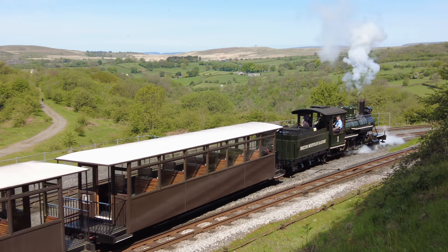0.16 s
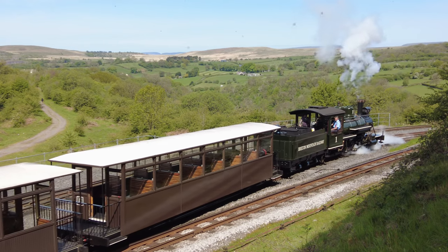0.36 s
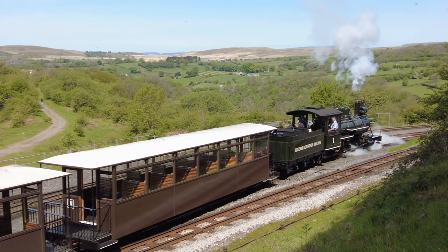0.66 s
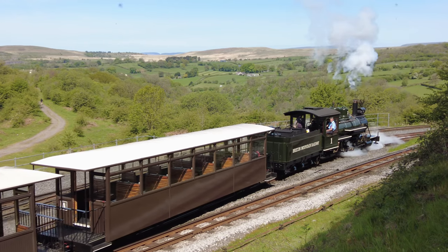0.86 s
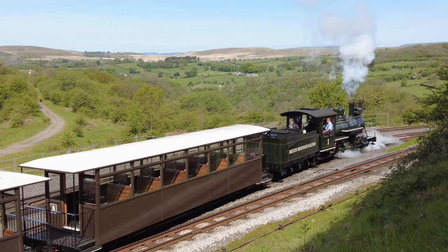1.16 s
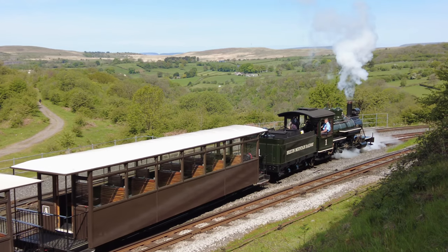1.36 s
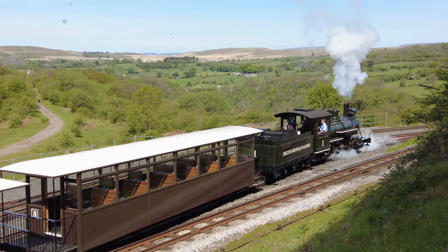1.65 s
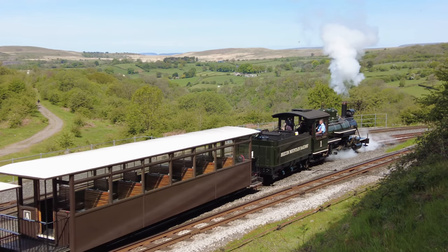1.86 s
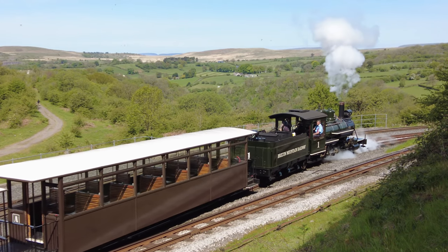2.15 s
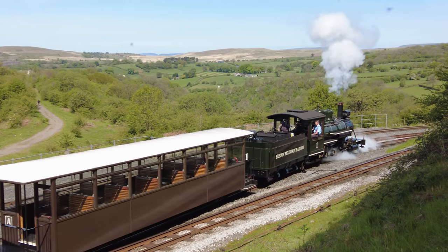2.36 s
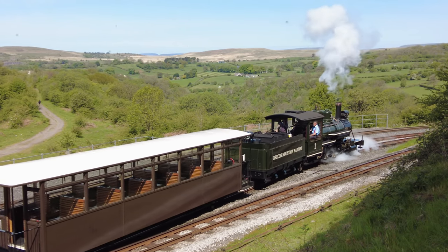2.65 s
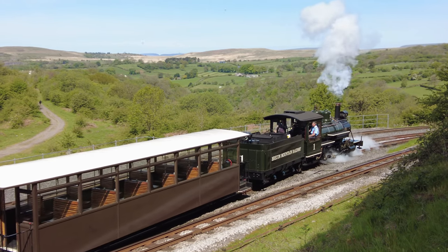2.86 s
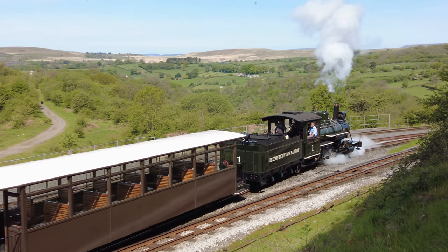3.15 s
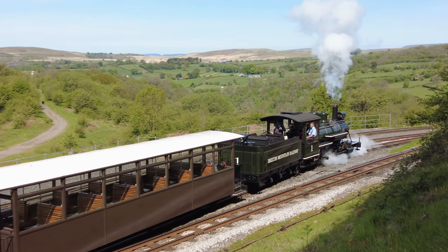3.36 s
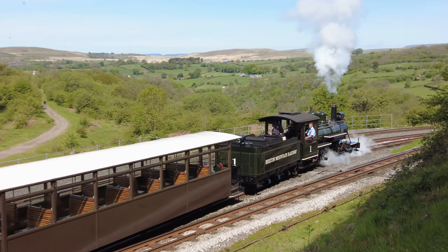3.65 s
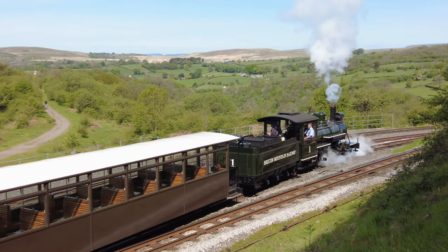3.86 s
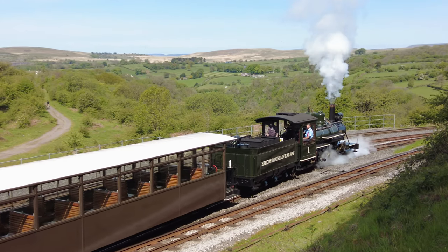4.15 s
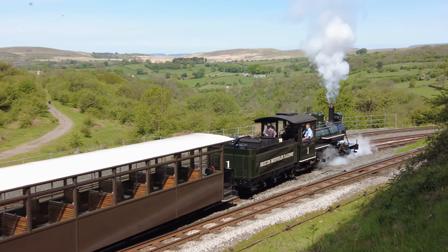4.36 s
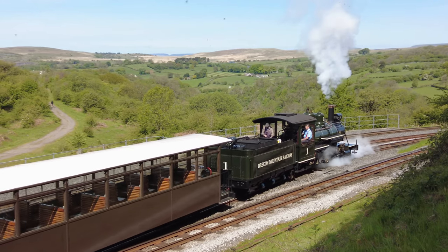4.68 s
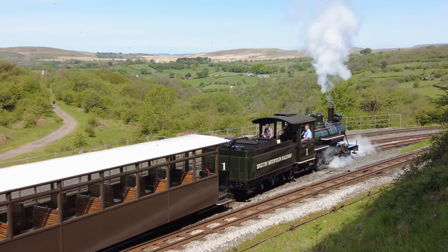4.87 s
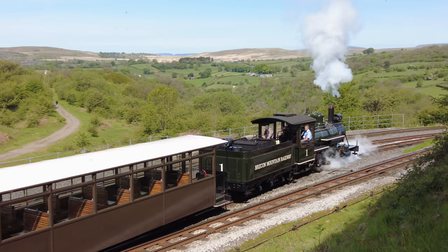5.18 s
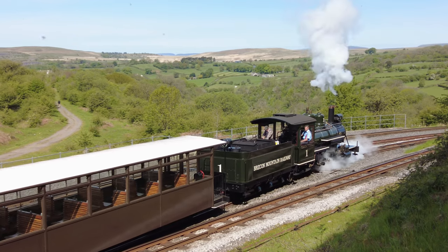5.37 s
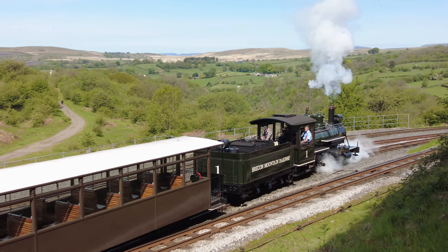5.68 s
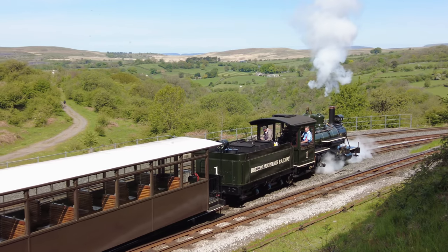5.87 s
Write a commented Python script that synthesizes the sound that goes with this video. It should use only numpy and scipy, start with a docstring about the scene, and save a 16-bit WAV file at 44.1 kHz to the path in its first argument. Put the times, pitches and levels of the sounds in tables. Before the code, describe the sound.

Soft, hollow steam-engine puffs beat evenly through loud breathy cylinder hiss, with low carriage rumble, dull rail knocks and one tiny steel squeak.

```python
"""Exhaust beats of a small steam locomotive ring in its chimney on an open hillside.
Open cylinder cocks hiss with each piston stroke and fall away at its end: noise through drain-pipe resonances.
Behind them the carriages rumble, lurch and knock: low noise on level curves, and struck resonators.
A piece of steel squeaks once, as decaying sine partials; a faint noise tail answers the beats."""
import sys
import numpy as np
from scipy import signal
from scipy.fft import rfft, irfft, next_fast_len
from scipy.io import wavfile
from scipy.ndimage import uniform_filter1d, map_coordinates

SR = 44100
rng = np.random.default_rng(int(sys.argv[2]) if len(sys.argv) > 2 else 0)


def to_wav(sig):
    """Store sig (one row per channel, or 1-D mono) as 16-bit WAV at the path in sys.argv[1].

    Samples outside -1..1 are clipped; the rate is SR.
    """
    pcm = np.clip(np.atleast_2d(sig), -1, 1) * 32767
    pcm = np.round(pcm).astype(np.int16)
    wavfile.write(sys.argv[1], SR, pcm.T)  # frames by channels


N = 265482

# exhaust beats, before layer offsets: [t/s, level/dB, width/s, chimney boom level/dB, jet bark level/dB]
CHUFFS = [(0.081, -23.5, 0.024, -3, -6), (0.646, -23.5, 0.022, -4.5, -5.5), (1.201, -23, 0.019, -3.5, -7),
          (1.79, -21, 0.023, -5.5, -10), (2.395, -21, .022, -3, -7), (2.946, -20, 0.021, -4.5, -13),
          (3.489, -22.5, 0.018, -1, -9), (4.063, -22.5, 0.024, -2.5, -10), (4.649, -20.5, 0.023, -2, -10),
          (5.194, -22, 0.023, -3.5, -6), (5.724, -23.5, 0.024, -1.5, -8.5)]
# colour of the chimney body: [f/Hz, level/dB per Hz]
CHIMNEY = [(60, -30), (150, -13), (240, -11.5), (350, -9), (430, -3.5), (620, -1), (820, -2.5),
           (1000, -9.5), (1350, -14), (1800, -19.5), (4000, -52)]
# colour of the sharp blast-pipe jet: [f/Hz, level/dB per Hz]
BLAST = [(400, -22), (900, 7), (1600, 2.5), (2400, 5), (3200, -1.5), (5000, -7), (10000, -34)]
# air modes of the chimney: [f/Hz, width/Hz, lift/dB]
CHIMNEY_MODES = [(324, 35, 5.5), (467.6, 50, 8), (581, 26, 6), (630, 47, 5), (810, 100, 2), (1127, 50, 5.5),
                 (1270, 83, 7), (1800, 50, 5)]


def exhaust(jet_lead_s=0.0064, boom_lag_s=0.002, sag_lag_s=0.0072, sag_db=-7, rough_db=0.73, split_hz=530):
    """Each beat starts with a sharp jet, fills the chimney, and darkens as the pressure drops."""
    jet, body, boom, sag = np.zeros((4, N))
    for s, db, width, boom_db, bark_db in CHUFFS:
        jet += amp(db + bark_db) * swell(s - jet_lead_s, width)
        body += amp(db) * swell(s - .002, 0.66 * width)
        boom += amp(db + boom_db - 3.0) * swell(s + boom_lag_s, 0.93 * width)
        sag += amp(db + boom_db + sag_db) * swell(s + sag_lag_s, width)
    chimney = rush(CHIMNEY, CHIMNEY_MODES)
    low = below(chimney, split_hz)
    puff = body * even(chimney - low, span=0.035)
    puff += boom * even(low, span=0.034)
    dark = rush([(80, -13), (250, -5.5), (480, -0.5), (700, -9), (1500, -33)], CHIMNEY_MODES)
    puff += sag * dark
    puff += jet * rush(BLAST) * amp(1.5 * wobble(540))
    return puff * amp(rough_db * wobble(170))  # eddies tear at the blast


# colour of the steam jet, before its bands are levelled: [f/Hz, level/dB per Hz]
JET = [(300, -24), (1050, -18.5), (1400, -11.5), (2150, -6.5), (2500, -4), (3400, -1), (5000, -1.5),
       (6300, -1), (8500, -0.5), (10500, -2), (12000, -7.5), (14500, -9)]
# resonances of the drain pipes: [f/Hz, width/Hz, lift/dB]
COCK_MODES = [(1269, 39, 9), (1930, 63, 6), (2724, 100, 4.5), (3030, 82, 4.5), (3970, 71, 2),
              (4220, 105, 5.5), (4500, 700, 4), (5070, 69, -1), (6070, 230, 2), (7720, 450, 5.5),
              (9100, 200, 1)]
SHUT_DB, SHUT_S = 8, 0.016  # dip of the hiss at dead centre: depth, width
SPURT_DB, SPURT_LAG_S, SPURT_S = 1.6, .055, .022  # spurt as the valve reopens: lift, delay, width
HOLLOW_FOLLOWS, SIZZLE_SWELL_DB = .5, 2.5  # share of the swell in the hollow rush; extra swell of the sizzle


def cocks(flutter_db=.5, band_flutter_db=0.64, wander_db=.4, rush_db=-5.5, hiss_db=-3, sizzle_db=-3,
          drone_db=-44, drone_share=0.3):
    """Steam whistles faintly in the drain pipes and breaks into a hiss that swells and shuts with each stroke."""
    level_db, swell_db, hollow_db, bright_db, slack = piston()
    open_db = level_db
    for s, *_ in STROKES:
        open_db = open_db + SPURT_DB * swell(s + SPURT_LAG_S, SPURT_S) - SHUT_DB * swell(s, SHUT_S)
    sag_db = swell_db * slack
    hollow_flow_db = hollow_db - HOLLOW_FOLLOWS * sag_db
    jet = patchy(rush(JET, COCK_MODES), depth_db=1.4)
    lowest, low, middle = below(jet, 1830), below(jet, 3620), below(jet, 6930)
    parts = [(low - lowest, rush_db + hollow_flow_db),
             (middle - low, hiss_db - sag_db),
             (jet - middle, sizzle_db + bright_db - sag_db - SIZZLE_SWELL_DB * slack)]
    steam = sum(unit(part) * amp(db + band_flutter_db * wobble(35)) for part, db in parts)
    # the lowest pipe tone grows only slowly with the flow
    flow_db = open_db + hollow_flow_db
    drone = unit(lowest) * amp(drone_db + drone_share * (flow_db - flow_db.mean()) + wobble(20))
    unsteady_db = wander_db * wobble(8) + flutter_db * wobble(45) + 0.21 * wobble(200)
    return drone + steam * amp(open_db + unsteady_db)


# strokes of the near cylinder, alternately strong and weak, before layer offsets:
# [dead centre t/s, crest level/dB, swell level/dB, crest as share of stroke, hollow level/dB, sizzle level/dB]
STROKES = [(-0.98, -33, 0, .5, 0, -2), (0.128, -24.2, 9.5, .55, -4.8, -2.2),
           (1.243, -30.4, .7, .35, -3, -3.2), (2.447, -23.9, 11, .67, -4.8, -1.3),
           (3.526, -30.8, 1.8, .55, -1.6, .9), (4.697, -24, 7.8, .88, -.7, -.7),
           (5.765, -30, 0, .4, .3, -1)]
LAST_STROKE_S, END_SLACK = 1.13, .6  # length of the last stroke; share of the swell lost again by a stroke's end


def piston():
    """Piston travel drives the steam: level, swell, hollow rush, sizzle (dB) and slack (1 at start, 0 at crest)."""
    t = np.arange(N) / SR
    starts, *columns = np.transpose(STROKES)
    lengths = np.append(np.diff(starts), LAST_STROKE_S)
    stroke = np.searchsorted(starts, t) - 1
    level_db, swell_db, crest, hollow_db, sizzle_db = np.array(columns)[:, stroke]
    past = (t - starts[stroke]) / lengths[stroke] - crest
    rising = (past / crest) ** 2
    falling = END_SLACK * (past / np.maximum(1 - crest, 1e-3)) ** 2
    slack = np.where(past < 0, rising, falling)
    return uniform_filter1d(np.array([level_db, swell_db, hollow_db, sizzle_db, slack]), size=1024, axis=1)


def patchy(x, depth_db):
    """Turbulence lifts and drops patches a few hundred hertz wide and a tenth of a second long."""
    z = signal.stft(x, nperseg=512)[2]
    field = rng.standard_normal(z.shape[1:])
    field = uniform_filter1d(field, size=4, axis=0)
    field = uniform_filter1d(field, size=20, axis=1)
    return signal.istft(z * amp(depth_db * unit(field)), nperseg=512)[1][:, :N]


# copies of the hiss off ballast and frames: [delay t/s at mid-scene, gain]
GROUND = [(.0016, 0.1), (.00247, -.09), (.0051, .05), (.0083, 0.028)]


def grounded(x, drift=0.0046):
    """Short reflections comb the hiss; their paths change by a share drift each second as the engine moves."""
    n = np.arange(N)
    stretch = 1 + drift * (n - N / 2) / SR
    out = x.copy()
    for delay, gain in GROUND:
        out += gain * np.array([np.interp(n - delay * SR * stretch, n, c) for c in x])
    return out


# rolling carriages, before layer offsets: [t/s, deep rumble level/dB, wheel roll level/dB]
RUMBLE = [(0.0, -37, -46), (0.3, -36, -41), (0.9, -44, -48), (1.35, -36, -42), (1.62, -39, -44),
          (2.2, -36, -44), (2.7, -41, -43), (3.4, -39, -40), (4.4, -38, -42), (4.95, -41, -45),
          (5.3, -37, -42), (6.02, -41, -45)]
# colour of the deep rumble: [f/Hz, level/dB per Hz]
DEEP = [(10, -12), (22, 0), (42, 0), (60, -2), (90, -10), (160, -48), (400, -74)]
# colour of the wheel roll: [f/Hz, level/dB per Hz]
ROLL = [(50, -10.5), (100, 1), (125, -1.5), (160, -1), (230, -9.5), (380, -16), (480, -15.5), (700, -33),
        (1100, -41), (3000, -45)]
# heavy lurches of the carriages: [t/s, deep level/dB, width/s]
LURCHES = [(.24, -36, .018), (.4, -32, .016), (1.4, -38, .03), (2.25, -29.5, .02), (2.34, -29, .026)]
DEEP_DB, ROLL_DB = -0.8, -1.2  # each layer over its level curve
PUSH_DB, THUMP_DB, PUSH_S = -38, -38, .032  # low puff of air at a beat: deep part, thump, width
LURCH_ROLL_DB = -13  # wheel roll in a lurch, relative to its deep part


def rumble(deep_uneven_db=2.6, roll_uneven_db=1.8):
    """Heavy carriages roll unevenly on the rails and lurch; each exhaust beat adds a low push of air."""
    deep_db, roll_db = curves(RUMBLE)
    beats = sum(swell(s, PUSH_S) for s, *_ in CHUFFS)
    lurches = sum(amp(db) * swell(s, width) for s, db, width in LURCHES)
    deep_roll = amp(deep_db + DEEP_DB + deep_uneven_db * wobble(14))
    wheel_roll = amp(roll_db + ROLL_DB + roll_uneven_db * wobble(25))
    # unrelated causes add in power
    deep = np.hypot(deep_roll, amp(PUSH_DB) * beats + lurches)
    roll = np.hypot(wheel_roll, amp(THUMP_DB) * beats + amp(LURCH_ROLL_DB) * lurches)
    return even(rush(DEEP), span=0.115) * deep + rush(ROLL) * roll


# wheels over rail joints and slack couplings: [t/s, nominal level/dB, dull thud relative level/dB]
KNOCKS = [(.205, -31, -7), (.295, -31.5, -3), (0.344, -39, 6), (.97, -45, -6), (1.315, -29.5, -11),
          (1.388, -41, 8.5), (3.355, -34, -18), (4.232, -33.5, -3), (5.24, -28, -7), (5.595, -28, -11)]
# ring of a bogie: [f/Hz, width/Hz, level/dB]
BOGIE = [(330, 140, -7), (520, 170, 6), (780, 240, -1), (1100, 140, -10)]
# ring of the carriage floor: [f/Hz, width/Hz, level/dB]
THUD = [(150, 93, -4), (240, 120, -1)]
# colour of steel rolling on steel: [f/Hz, level/dB per Hz]
TREAD = [(100, -20), (220, -3.5), (400, -2), (560, -1), (850, -1), (1150, -3.5), (1350, -17), (3000, -35)]
# loudness of the treads, before their unevenness: [t/s, level/dB]
TREAD_LEVEL = [(0, -51), (2, -47.3), (6, -47.2)]
# the carriages, off to the left: [f/Hz, left lead/rad]
ASIDE = [(100, .3), (300, 1.2), (550, 1.75), (850, 2.1), (1300, 1.6)]


def bogies(t60=.13, attack_s=0.0044, spread=0.29):
    """Wheel treads roar softly and knock over the joints, away to the left and partly diffuse."""
    t = np.arange(N) / SR
    knock, thud = np.zeros((2, N))
    for s, db, thud_db in KNOCKS:
        age = np.maximum(t - s, 0)
        blow = amp(db - 60 * age / t60) * (1 - np.exp(-age / attack_s))
        knock += blow
        thud += blow * amp(thud_db)
    tread_db, = curves(TREAD_LEVEL)
    pair = rush(TREAD) * amp(tread_db + 1.6 * wobble(7.8))
    for blows, modes in (knock, BOGIE), (thud, THUD):
        grit = rng.standard_normal((2, N))
        pair += ring(grit * blows, modes) / np.std(ring(grit, modes))
    sign = np.array([[1], [-1]])
    both = (pair[0] + spread * sign * pair[1]) / np.hypot(1, spread)
    return filtered(both, lambda hz: np.exp(.5j * sign * along(ASIDE, hz)))


# rubs of steel on steel: [t/s, nominal level/dB, rub length t/s]
SQUEAKS = [(2.211, -27.5, 0.011)]
# partials of the ringing steel: [f/Hz, relative level/dB, t60/s]
STEEL = [(740, -11, .05), (1272, 1.5, 0.083), (1326, -9, .06), (1717, -5, .066), (1870, -12, .1)]


def squeak(attack_s=0.0053, waver_rad=.5, lead_rad=0.98):
    """Steel rubs on steel under a carriage and rings with a short whistling note; the left side leads."""
    t, out = np.arange(N) / SR, np.zeros((2, N))
    lead = np.array([[lead_rad], [0]])
    for s, db, length in SQUEAKS:
        rise = 1 - np.exp(-np.maximum(t - s, 0) / attack_s)
        free = np.maximum(t - s - length, 0)  # time since the rub let go
        for hz, mode_db, t60 in STEEL:
            level = rise * amp(db + mode_db - 60 * free / t60)
            out += level * np.sin(2 * np.pi * hz * t + lead + waver_rad * wobble(250))
    return out


# decay of the hillside tail: [f/Hz, t60/s]
HILL = [(200, .6), (1000, 0.52), (6000, 0.14)]


def hillside(x):
    """Slope and trees scatter back a thin tail whose treble dies first."""
    hz, t, z = signal.stft(rng.standard_normal((2, SR)), SR, nperseg=256)
    decay = amp(-60 * t / along(HILL, hz)[:, None])
    tail = signal.istft(z * decay, SR, nperseg=256)[1]
    return signal.fftconvolve(x, tail / np.linalg.norm(tail[0]), axes=1)[:, :N]


# likeness of left and right: [f/Hz, likeness 0-1]
ALIKE = [(60, 0.99), (700, 0.94), (1900, 0.89), (2700, 0.91), (3450, 0.43), (4300, 0.66), (5250, 0.18),
         (6200, 0.53), (7000, .3), (7800, 0.41), (8600, 0.24), (11000, 0.69), (14000, 0.25)]
# balance of the sides: [f/Hz, left minus right level/dB]
PAN = [(30, -3), (100, 0), (3200, 0), (4300, -2.5), (6000, 0.7), (7300, -2.5), (8800, -0.5), (10000, -1),
       (14000, -3)]
# phase between the sides: [f/Hz, left lead/rad]
LEAD = [(100, 0), (280, -.13), (480, -.55), (750, -.68), (1000, -.4), (1500, -.08), (1750, -.3),
        (2000, -.1), (2200, -.45), (3000, -.5), (3700, -1.05), (5100, -.5), (6700, -2.3), (7900, -.9),
        (9400, -2.3), (10500, -2.1), (13000, -3)]


def ports(pair):
    """The first signal reaches both sides alike, the second opposed; the left mostly hears a little later."""
    turn = lambda hz: np.arccos(np.clip(along(ALIKE, hz), 0, 1)) / 2
    mid, side = filtered(pair, lambda hz: np.array([np.cos(turn(hz)), np.sin(turn(hz))]))
    sign = np.array([[1], [-1]]) / 2
    offset = lambda hz: amp(sign * along(PAN, hz)) * np.exp(1j * sign * along(LEAD, hz))
    return filtered(np.array([mid + side, mid - side]), offset)


def rush(spectrum, modes=()):
    """Two unrelated noises of joint rms 1, coloured by a spectrum and lifted at its resonances."""
    lift = lambda hz: sum(db / (1 + (2 * (hz - centre) / width) ** 2) for centre, width, db in modes)
    return unit(filtered(rng.standard_normal((2, N)), lambda hz: amp(along(spectrum, hz) + lift(hz))))


def ring(x, modes):
    """x through damped (f/Hz, width/Hz, level/dB) resonators."""
    return filtered(x, lambda f: sum(amp(db) * 1j * f * w / (c * c - f * f + 1j * f * w) for c, w, db in modes))


def even(x, span):
    """Noise whose power is held steady over span seconds."""
    power = uniform_filter1d(x ** 2, max(int(span * SR), 1), axis=-1)
    return x / np.sqrt(np.abs(power) + 1e-9)


def below(x, edge_hz):
    """The part of x under a steep edge."""
    return filtered(x, lambda hz: 1 / (1 + (hz / edge_hz) ** 20))


def filtered(x, response):
    """x times a complex response of frequency."""
    m = next_fast_len(N + SR // 2)  # room for tails
    return irfft(rfft(x, m) * response(np.fft.rfftfreq(m, 1 / SR)), m)[..., :N]


def swell(s, width):
    """A bell around time s, down to 1/e at twice the width either side."""
    return np.exp(-((np.arange(N) / SR - s) / (2 * width)) ** 2)


def wobble(rate):
    """A smooth random curve, rate knots a second."""
    return map_coordinates(rng.standard_normal(int(N * rate / SR) + 4), [np.arange(N) * rate / SR])


def curves(rows):
    """One value per sample for each column after the time."""
    s, *cols = np.transpose(rows)
    return [np.interp(np.arange(N) / SR, s, c) for c in cols]


def along(points, hz):
    """(f/Hz, value) points read on a log axis."""
    f, v = np.transpose(points)
    return np.interp(np.log(hz + 1), np.log(f + 1), v)


def unit(x):
    """Scale to rms 1."""
    return x / np.sqrt(np.mean(x ** 2) + 1e-20)


def amp(db):
    """Decibels to gain."""
    return 10 ** (np.asarray(db) / 20)


def scene():
    """The whole train, with the hillside answering its beats."""
    beats = exhaust()
    echo = amp(-21) * hillside(beats)
    engine = ports(beats + echo + grounded(cocks()) + rumble())
    return engine + bogies() + squeak()


TOP_HZ = 14480


def record(dry):
    """A sharp band limit removes everything from TOP_HZ upward."""
    return filtered(dry, lambda hz: hz < TOP_HZ)


dry = scene()
out = record(dry)
to_wav(out)
```